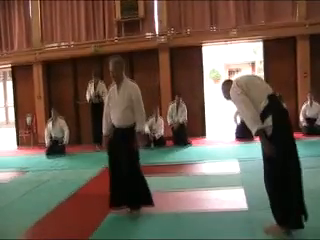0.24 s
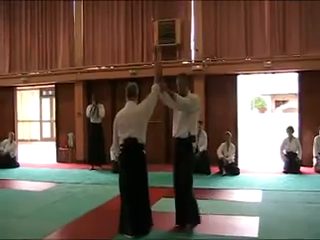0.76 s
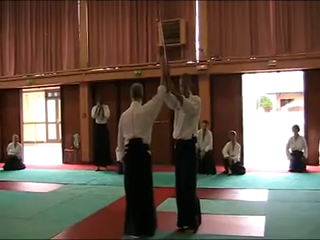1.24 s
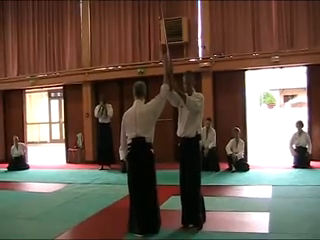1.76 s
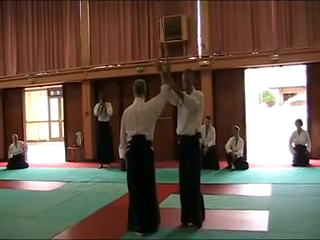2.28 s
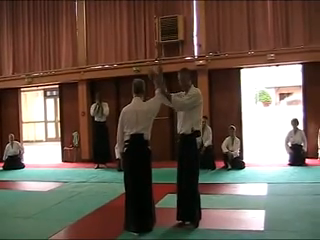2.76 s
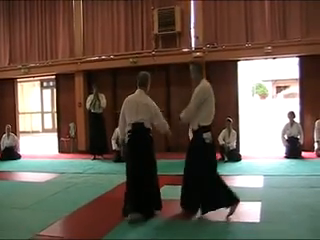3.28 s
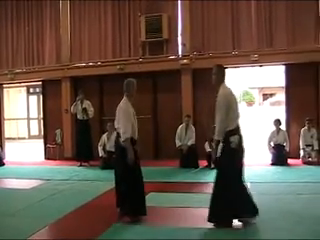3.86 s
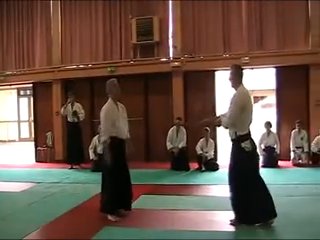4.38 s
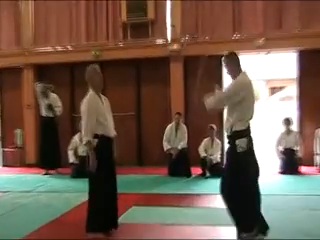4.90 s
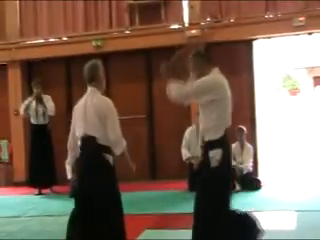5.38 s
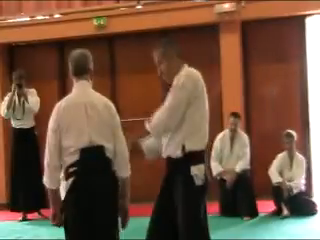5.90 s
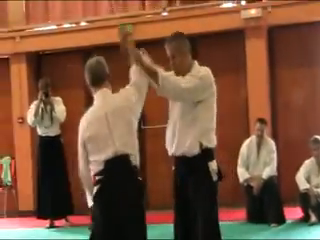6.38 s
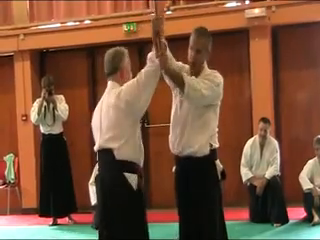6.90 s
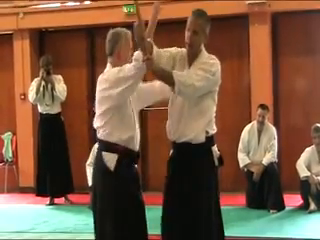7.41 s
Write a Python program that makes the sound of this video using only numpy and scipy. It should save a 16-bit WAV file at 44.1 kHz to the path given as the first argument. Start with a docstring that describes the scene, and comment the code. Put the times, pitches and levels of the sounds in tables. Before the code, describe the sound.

A large, echoing hall with soft air hiss, slightly louder at first over a low boom, dipping briefly near 0.4 s before a faint motor hum and deep drone settle in. Small scuffs and light clicks open, with a sharp close plastic click at 0.26 s. From 0.5 to about 3 s a distant still camera clacks steadily four times a second; a gentle slide passes at 0.8 s, a weak click at 1.3 s. Around 3.2 s feet slide, then 3.55-4.4 s brings soft pats, dull bumps and bright swishes, strongest at 3.75 s. Small clicks tick at 4.5-4.7 s, a thin zoom whine rises near 4.9-5.2 s, and a sharp click snaps at 5.25 s. At 5.85 s one very loud slap and thud strikes the padding, its reverberation fading over nearly a second. A sharp click at 6.0 s, faint slides, two distant shutter clacks from 7.2 s and a last soft rub finish.

```python
"""Room air hisses over a low boom, then bare feet or cloth slide and fingers click a camcorder's case.
This is martial-arts practice in a large hall: one hard landing thuds on the padding and the hall answers.
A still camera across the room fires two bursts; a small motor hums over a low drone, a zoom motor whines.
Slides, slaps and shutter are shaped noise; padding, case and hall ring as decaying modes or dying noise.
"""
import sys
import numpy as np
from scipy import signal
from scipy.fft import rfft, irfft
from scipy.io import wavfile
from scipy.ndimage import uniform_filter1d

SR = 44100
rng = np.random.default_rng(int(sys.argv[2]) if len(sys.argv) > 2 else 0)


def wrap_up_sound(samples):
    """Save the sound to the file named by the first command line argument, as 16-bit audio."""
    columns = np.atleast_2d(samples).T
    # keep every value between -1 and 1, then stretch to whole-number steps
    tamed = np.clip(columns, -1, 1)
    steps = np.round(tamed * 32767).astype(np.int16)
    wavfile.write(sys.argv[1], SR, steps)


N = 337365
TIME = np.arange(N) / SR

# Brief dip in level near the start: start_s, end_s
DIP = (.372, .393)


def undb(db):
    """Decibels to gain."""
    return 10 ** (np.asarray(db) / 20)


def unit(x):
    """Scale to rms 1."""
    return x / np.sqrt(np.mean(x ** 2))


def curves(rows):
    """Columns of a table, joined by straight lines in time."""
    s, *columns = np.transpose(rows)
    return [np.interp(TIME, s, column) for column in columns]


def on_log(hz, points):
    """Read (Hz, value) points on a log-frequency axis."""
    f, value = np.transpose(points)
    return np.interp(np.log(np.maximum(hz, 1)), np.log(f), value)


def colour(x, points, tilt_db=0):
    """Filter x by (Hz, dB) points, tilted by dB per octave from the first point."""
    hz = np.fft.rfftfreq(x.shape[-1], 1 / SR)
    lowest_hz = points[0][0]
    tilted = [(f, db + tilt_db * np.log2(f / lowest_hz)) for f, db in points]
    return irfft(rfft(x) * undb(on_log(hz, tilted)), x.shape[-1])


def ring(modes, size=8192):
    """Impulse response of damped modes (Hz, width Hz, dB): a wider mode dies sooner."""
    t = TIME[:size]
    response = 0
    for hz, width, db in modes:
        fade = np.exp(-np.pi * abs(width) * t)
        response = response + undb(db) * fade * np.sin(2 * np.pi * hz * t)
    return response


def convolve(x, response):
    """Pass sound through a response, keeping its length."""
    return signal.fftconvolve(np.atleast_2d(x), np.atleast_2d(response), axes=1)[:, :x.shape[-1]]


def stereo_noise(size, side):
    """Two channels of noise whose difference follows (Hz, side dB) points."""
    mid, diff = rng.standard_normal((2, size))
    return unit(mid + colour(diff, side) * np.array([[1], [-1]]))


def add(out, s, x):
    """Mix x into out from time s."""
    i = int(round(s * SR))
    out[..., i:i + x.shape[-1]] += x[..., :out.shape[-1] - i]


def swell(start, length):
    """A smooth rise and fall between 0 and 1."""
    return np.sin(np.pi * np.clip((TIME - start) / length, 0, 1))


def sweep(t, rise, fade):
    """Speed of a sliding limb: it gathers pace, holds and comes to rest."""
    hold_share = 0.97  # top speed lasts this share of the rise time
    stopped = np.maximum(t - rise * (1 + hold_share), 0)
    return np.sin(np.pi / 2 * np.minimum(t / rise, 1)) * np.exp(-stopped / fade)


def burst(points, fade_s, size=4096):
    """A short contact: coloured noise that starts at once and dies away."""
    noise = stereo_noise(size, [(300, -18), (8000, -3)])
    return unit(colour(noise, points)) * np.exp(-TIME[:size] / fade_s)


def tone(hz, waver):
    """A hum of rms about 1 whose strength wavers slightly."""
    wobble = unit(colour(rng.standard_normal(N), [(5, 2), (20, -45), (100, -80)]))
    phase = 2 * np.pi * np.cumsum(hz * np.ones(N)) / SR
    return np.sqrt(2) * (1 + min(waver, 1 / 3) * wobble) * np.sin(phase)


def hall(x, build_s=0.013, size=65536):
    """Diffuse tail: every band dies at its own rate; the bass is alike at both microphones."""
    # Hall bands: centre_hz, t60_s (time to fall 60 dB), level_db
    bands = [(45.1, .8, -29), (85.6, 0.97, 3.5), (140, 0.72, 5.5), (246.9, 0.46, 4), (503.1, 0.36, 5.5),
             (1040, 0.83, 1), (2500, 0.91, 3), (5940, 0.85, 2), (13780, 0.57, 1.5)]
    side = [(150, -37), (400, -23), (1300, -10), (4000, -4.0), (12000, 0.5)]
    noise = rfft(stereo_noise(size, side))
    hz, t, tail = np.fft.rfftfreq(size, 1 / SR), TIME[:size], 0
    for f, t60, db in bands:
        # a crossfade that is 1 at this band and 0 at its neighbours
        share = on_log(hz, [(row[0], row[0] == f) for row in bands])
        band = irfft(noise * share)
        fade = undb(-60 * t / t60) * (1 - np.exp(-(t / build_s) ** 2))
        tail = tail + undb(db) * band * fade / np.linalg.norm(fade)
    return convolve(x, tail)


def background():
    """Air and microphone hiss are shaped noise; drone, small motor and zoom are wavering sines."""
    # Spectrum of room air and hiss: freq_hz, level_db
    air_colour = [(15, -24), (25, -14.5), (59, -3.5), (134, -5), (229, -7), (270, -5.5), (317, -8),
                  (373, -8), (451, -12), (840, -11), (1370, -16), (2410, -18), (7310, -26.5), (14000, -37),
                  (16000, -51)]
    # Wide skirts stir the air as the pair step apart: start_s, length_s, boost_db
    stir_start_s, stir_length_s, stir_db = (3.76, 0.69, 1.6)
    # Motor hum: time_s, level_db
    hum_level = [(.42, -63.5), (1.6, -58), (2.95, -58), (4.6, -69), (5.3, -64.5), (6.5, -59), (7.6, -59.5)]
    # Low drone: time_s, level_db
    drone_level = [(.42, -60.5), (2.0, -61), (2.55, -55.5), (3.7, -56), (4.6, -72), (5.25, -60),
                   (6.75, -59.5), (7.6, -70)]
    # A low boom and two whines of the lens's zoom motor: start_s, length_s, pitch_hz, peak_level_db
    brief_tones = [(0, .28, 67, -53), (4.88, .11, 4315, -70), (4.97, .2, 4800, -72)]
    air_db, opening_db = -52.5, 4  # room noise, and how much louder it is until the dip ends
    motor_hz, overshoot_hz, settle_s = 317.3, 8, 1
    drone_hz = 50.4
    running = TIME > DIP[1]

    side = [(50, -7), (130, 2.5), (700, 2.5), (3000, 0), (12000, 0.5)]
    noise = stereo_noise(N, side)
    stir = stir_db * swell(stir_start_s, stir_length_s)
    air = unit(colour(noise, air_colour)) * undb(air_db + opening_db * ~running + stir)
    # the small motor starts a little fast and settles
    pitch = motor_hz + overshoot_hz * np.exp(-np.maximum(TIME - DIP[1], 0) / settle_s)
    hum = tone(pitch, waver=0.049) * undb(curves(hum_level)[0])
    drone = tone(drone_hz, waver=.25) * undb(curves(drone_level)[0])
    brief = np.zeros(N)
    for s, length, hz, db in brief_tones:
        brief += undb(db) * swell(s, length) * tone(hz, waver=.15)
    return air + running * (hum + drone) + brief


def slides(grain_db=2.0, judder_db=0.95, room_db=-7, size=32768):
    """Countless tiny slips hiss as a sole or sleeve speeds up and stops; gripping skin squeaks."""
    # Sweeps of a sole or sleeve: start_s, rise_s, fade_s, level_db, tilt_db_per_octave,
    # squeak_db (against the hiss)
    strokes = [(.078, 0.012, 0.029, -48.5, 3.5, -2), (.76, 0.051, .05, -49, 5.5, -10.5),
               (3.15, 0.054, 0.36, -51, 5.5, -12), (3.21, 0.03, 0.03, -48, 2, -9),
               (3.718, 0.0048, 0.001, -45.5, 6.5, -8), (3.753, 0.04, 0.052, -34, 7, -26),
               (3.961, 0.043, 0.047, -45.5, 6.5, -26), (4.131, 0.038, 0.095, -48, 6, -29),
               (4.282, 0.016, 0.015, -37.5, 7, -5.5), (4.335, 0.032, 0.037, -50, 4, -28),
               (5.13, 0.012, .05, -53.5, 9, -25), (5.172, 0.023, 0.067, -41.5, 7, -40),
               (5.77, 0.0054, .008, -50, -4, -29), (5.815, 0.0066, 0.0099, -47.5, 7, -21),
               (6.19, .04, 0.17, -55.5, 8.5, -17), (6.315, 0.023, 0.03, -50.5, 5, -15),
               (6.479, 0.12, 0.18, -57, -1, -11), (6.944, 0.03, 0.056, -46, 4.5, -24),
               (7.54, 0.1, 0.068, -59, 10, -25)]
    # Friction on the mat cover, before each sweep's tilt: freq_hz, level_db
    rub_colour = [(250, -22), (700, -5), (1100, -3.5), (2200, 1.5), (2800, 1.5), (4700, -2), (7700, -7),
                  (11000, -19.5), (15500, -27.5)]
    # Skin gripping the cover: pitch_hz, width_hz, level_db
    squeak_modes = [(2570, 97, 6.5), (3040, 170, 11.5)]
    side = [(500, -27), (2500, -14.5), (8000, -20.0), (15000, -14.0)]
    out, t = np.zeros((2, N)), TIME[:size]
    for s, rise, fade, db, tilt_db, squeak_db in strokes:
        slips = stereo_noise(size, side) * undb(grain_db * rng.exponential(size=size))
        slow_noise = uniform_filter1d(rng.standard_normal(size), size=300)
        judder = undb(judder_db * unit(slow_noise))
        hiss = unit(colour(slips, rub_colour, tilt_db))
        squeak = undb(squeak_db) * unit(convolve(slips, ring(squeak_modes)))
        add(out, s, undb(db) * unit(hiss + squeak) * sweep(t, rise, fade) * judder)
    return out + undb(room_db) * hall(out)


def case_clicks(rattle_s=0.0023, settle_s=0.0074, contact_db_per_octave=5, panel_width_hz=380,
                hollow_width_hz=170, low_cut_hz=920, room_db=-27, size=2048, count=4):
    """A finger snap rings the touched panel and the hollow behind it; loose parts chatter briefly."""
    # Finger clicks: start_s, level_db, panel_hz, panel_ring_db, hollow_ring_db,
    # rattle (relative, 0-1), pan_db (left minus right)
    finger_clicks = [(0.116, -43, 2300, -3, 3, 0.65, 4), (0.1289, -37.5, 2770, 23, -1, 0.45, -4),
                     (0.264, -21.5, 2020, 10, 7.5, 0.74, 1.5), (1.312, -44.5, 1620, -10, 2, 0.6, 0),
                     (4.502, -51.5, 2500, -16, 1, 0.23, -16), (4.5371, -37.5, 2650, 19, -9, 0.8, -3),
                     (4.6646, -48, 2380, 11, -7, 0.44, -8), (5.247, -20, 2500, -9, -8.5, 0.72, 0),
                     (6.0103, -21, 2800, -1, -21, 0.92, -1.5)]
    # Plastic shell, before the contact softens its treble: pitch_hz, width_hz, level_db
    shell_modes = [(1020, 130, -36), (1960, 87, -38), (2470, 71, -15), (2650, 120, 1), (2800, 280, -6.5),
                   (3530, 220, -3), (4120, 200, -1), (5450, 430, -1), (7700, 2900, 6), (9300, 880, -6)]
    hollow_hz = 1260  # the air space inside the case
    out, t = np.zeros((2, N)), TIME[:size]
    # the shell is too small to radiate bass
    small_shell = signal.butter(8, low_cut_hz, "high", fs=SR, output="sos")
    for s, db, hz, panel_db, hollow_db, rattle, pan_db in finger_clicks:
        modes = []
        for f, width, gain in shell_modes:
            octaves_above = max(np.log2(f / hz), 0)
            modes.append((f, width, gain - contact_db_per_octave * octaves_above))
        modes += [(hz, panel_width_hz, panel_db), (hollow_hz, hollow_width_hz, hollow_db)]
        chatter = stereo_noise(size, [(1000, -7.5), (4000, -0.5)]) * np.exp(-t / rattle_s)
        force = 0.56 * rattle * chatter
        force[:, 0] += 1  # the snap itself
        # the chatter smears the blow in time but hardly colours it
        for _ in range(count):
            spectrum = rfft(force)
            flat = irfft(spectrum / (abs(spectrum) + 1e-9))
            force = flat * np.exp(-(t / settle_s) ** 2)
        click = signal.sosfilt(small_shell, convolve(force, ring(modes)))
        first = click[:, :SR // 200].std(axis=1, keepdims=True)  # level of the first 5 ms
        channel_db = db + np.array([[pan_db], [-pan_db]]) / 2
        add(out, s, undb(channel_db) * click / first)
    return out + undb(room_db) * hall(out)


def landing(cloth_db=-24, cloth_fade_s=0.0063, slap_echo_db=-4, thud_room_db=-7, cloth_room_db=5,
            size=1024):
    """Skin and cloth slap the cover; weight dents the padding, which springs back and rings."""
    # Skin slapping the mat cover: start_s, peak_level_db
    skin_slaps = [(5.8513, -15), (5.853, -1), (5.8543, -7.5)]
    # Spectrum of a slap: freq_hz, level_db
    slap_colour = [(100, -6), (400, 1), (650, 6.5), (1100, -4.5), (1800, -3), (2400, 4), (3000, -8.5),
                   (5000, -11), (9000, -9.5), (15000, -32)]
    # Heavy cotton whipping down: freq_hz, level_db
    cloth_colour = [(150, -21), (450, -1.5), (700, 7.5), (1100, 1), (1500, -1), (2300, 0.5), (3500, -2.5),
                    (7500, -9), (15000, -25.5)]
    # Weight sinking into the padding: peak_s, level_db (before the mat's filtering), pitch_hz
    weight_thuds = [(0.197, -49, 210), (3.725, -45, 220), (3.798, -49, 170), (3.868, -41, 258),
                    (5.8578, -8.5, 191), (5.875, -24, 140), (6.184, -38.5, 130)]
    # Mat and floor: pitch_hz, width_hz, level_db
    pad_modes = [(84.3, 11, -23.5), (170, 30, -23), (293, 43, -26), (397, 40, -66)]
    # First reflections: delay_s, level_db
    reflections = [(0.023, -14), (.037, -20), (.068, -21), (0.103, -26), (.166, -22)]
    slap, thud, cloth = np.zeros(N), np.zeros(N), np.zeros((2, N))
    # folding the cepstrum forward packs the slap's energy at its start (minimum phase)
    log_spectrum = np.log(undb(on_log(np.fft.rfftfreq(size, 1 / SR), slap_colour)))
    cepstrum = irfft(log_spectrum)
    crack = irfft(np.exp(rfft(2 * cepstrum * (np.arange(size) < size // 2))))
    for s, db in skin_slaps:
        add(slap, s, undb(db) * crack / abs(crack).max())
        add(cloth, s, undb(db + cloth_db) * burst(cloth_colour, cloth_fade_s))
    for s, db, hz in weight_thuds:
        push = (np.pi * hz * (TIME - s)) ** 2
        thud += undb(db) * (1 - 2 * push) * np.exp(-push)  # pressure follows the cover's acceleration
    body = thud + convolve(thud, ring(pad_modes))[0] * undb(-25.0)
    body = colour(body, [(30, -20), (55, -17), (85, 1.5)])  # a small patch radiates little deep bass
    early = np.zeros(N)
    for delay, db in reflections:
        add(early, delay, undb(db) * (body + undb(slap_echo_db) * slap))
    # the hardest slap leaves in all directions and comes back as a smooth wash
    spread = np.zeros(N)
    hardest_s = max(skin_slaps, key=lambda row: row[1])[0]
    add(spread, hardest_s, undb(cloth_room_db) * np.ones(1))
    wash = hall(colour(spread, cloth_colour))
    boom = hall(undb(thud_room_db) * body, build_s=0.047)  # builds slowly
    return body + slap + cloth + early + wash + boom


def shutter(room_db=-2):
    """A distant still camera: mirror and curtains clack as noise four frames a second; a spring pings."""
    # Bursts: first_frame_s, frame_count
    photo_bursts = [(.4885, 11), (7.2305, 2)]
    # One frame's mirror up, first curtain, second curtain, mirror down: delay_s, level_db, fade_s
    frame_blows = [(0, -47, 0.0043), (.007, -51, 0.025), (0.059, -53.5, .02), (0.078, -54.5, 0.0059)]
    # Spectrum of the clacks: freq_hz, level_db
    clack_colour = [(500, -4.5), (1300, -7.5), (1900, 2.5), (2900, 1.5), (3900, -1), (4700, -3.5),
                    (5600, -10.5), (8000, -9), (11000, -21.5), (15000, -20.5)]
    frame_s = .2509
    spring_hz, spring_db, spring_fade_s = 4700, -56, .009  # pings as the mirror comes down
    blows, pings, t = np.zeros(N), np.zeros(N), TIME[:SR // 4]
    ping = undb(spring_db) * np.exp(-t / spring_fade_s) * np.sin(2 * np.pi * spring_hz * t)
    for start, count in photo_bursts:
        for s in start + frame_s * np.arange(count):
            for delay, db, fade in frame_blows:
                add(blows, s + delay, undb(db) * np.exp(-t / fade))
            add(pings, s + frame_blows[-1][0], ping)
    noise = stereo_noise(N, [(1000, -24), (8000, -17.0)])
    clack = pings + blows * unit(colour(noise, clack_colour))
    return clack + undb(room_db) * hall(clack)


def steps(fade_s=0.013, room_db=-4):
    """Bare feet pat the mats: short dull noise bursts."""
    # Light footfalls: start_s, level_db
    footfalls = [(3.555, -51), (3.657, -51), (3.765, -46), (3.868, -46), (3.94, -57), (5.382, -50),
                 (5.78, -46.5)]
    # Spectrum of a footfall: freq_hz, level_db
    step_colour = [(150, -3), (450, -5.5), (720, 2), (1100, -15), (3000, -19), (12000, -44)]
    out = np.zeros((2, N))
    for s, db in footfalls:
        add(out, s, undb(db) * burst(step_colour, fade_s))
    return out + undb(room_db) * hall(out)


def scene():
    """Everything in the hall."""
    return background() + slides() + case_clicks() + landing() + shutter() + steps()


def record(dry, low_cut_hz=22):
    """The microphone sheds deep bass; the level dips briefly near the start; the top is cut steeply."""
    top_hz = 15700
    low_cut = signal.butter(2, low_cut_hz, "high", fs=SR, output="sos")
    thin = signal.sosfilt(low_cut, dry)
    dipped = (TIME > DIP[0]) & (TIME < DIP[1])
    dip = uniform_filter1d(1. * dipped, size=128)  # softened edges
    top_cut = signal.ellip(10, .2, 70, top_hz, fs=SR, output="sos")
    return signal.sosfilt(top_cut, thin * undb(-24 * dip))


dry = scene()
out = record(dry)
wrap_up_sound(out)
```